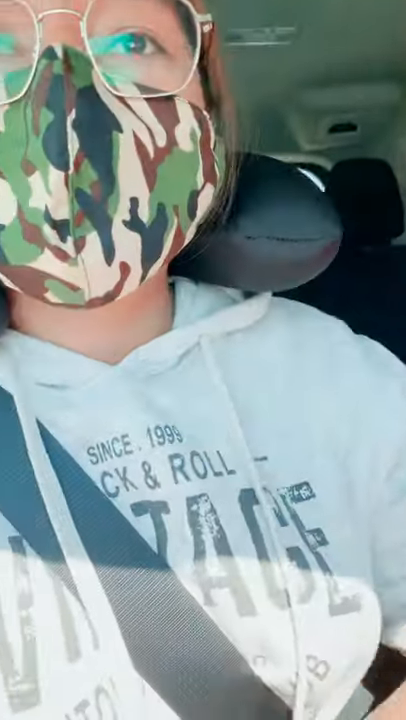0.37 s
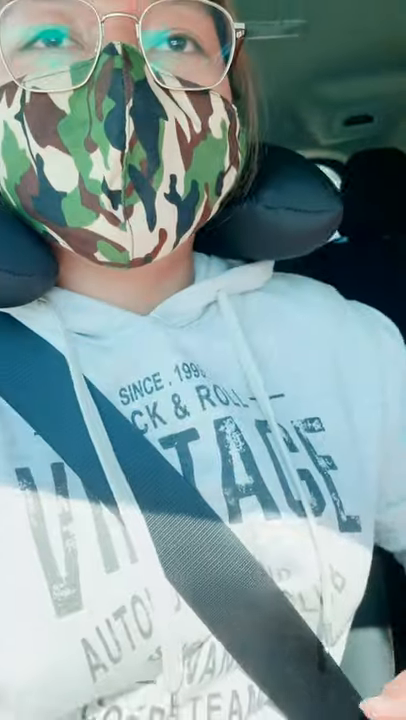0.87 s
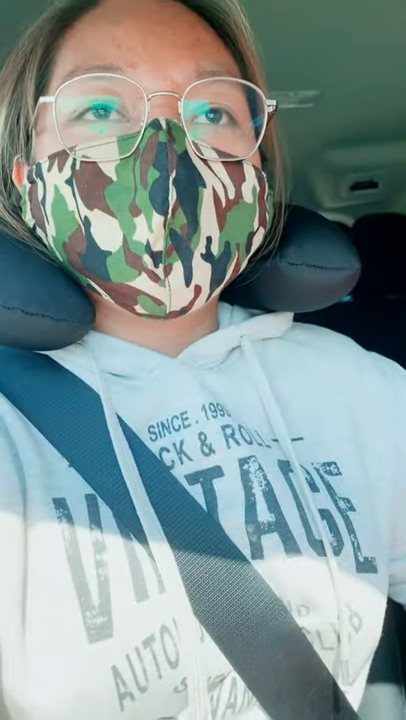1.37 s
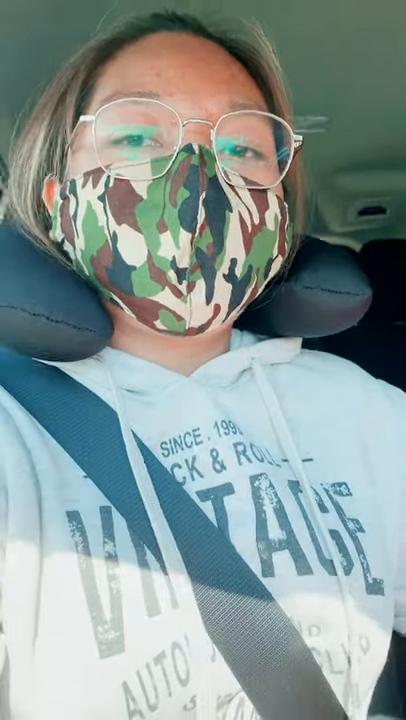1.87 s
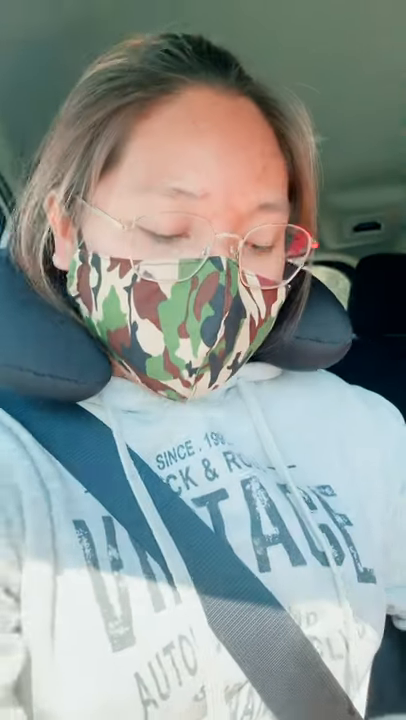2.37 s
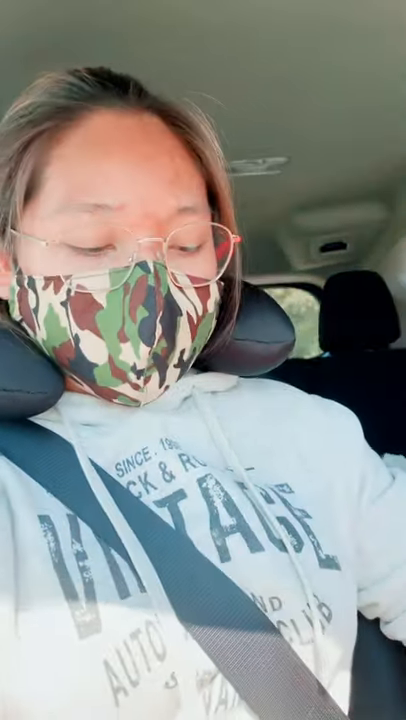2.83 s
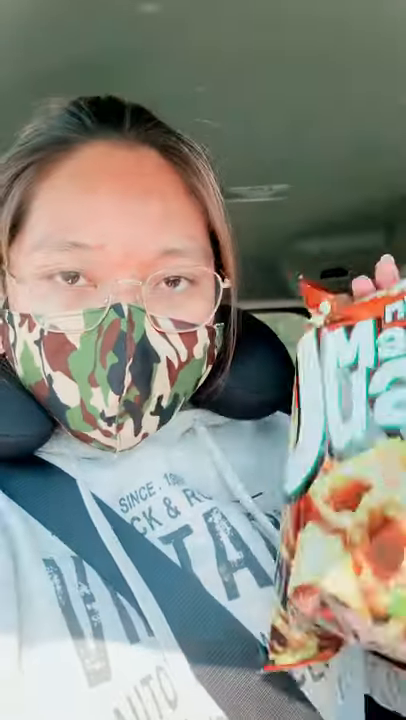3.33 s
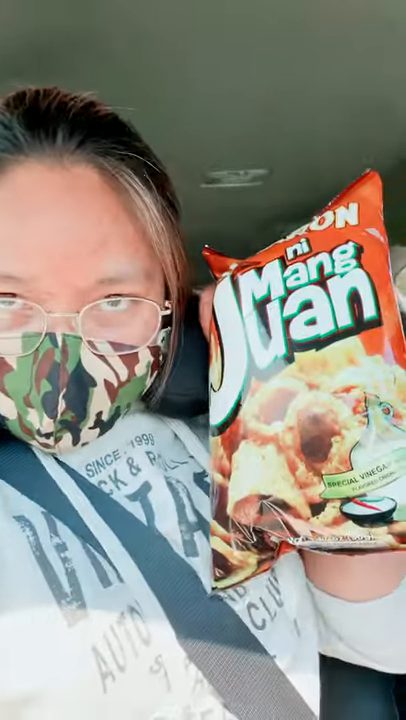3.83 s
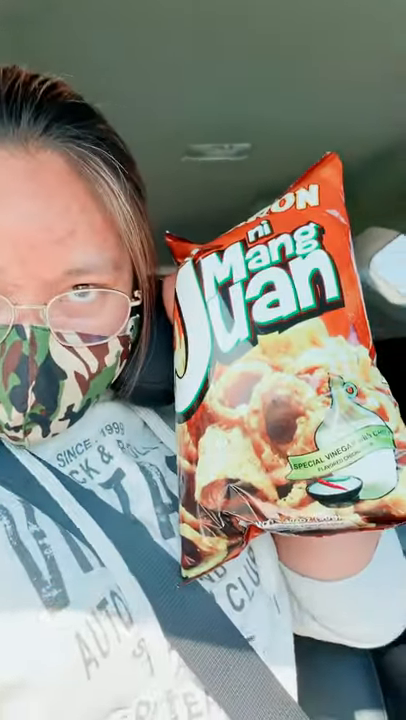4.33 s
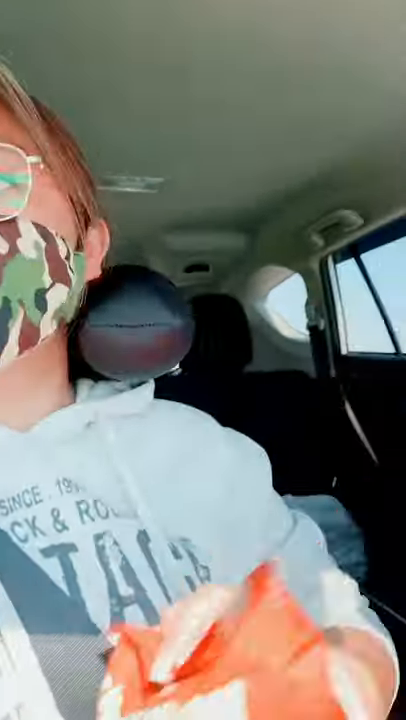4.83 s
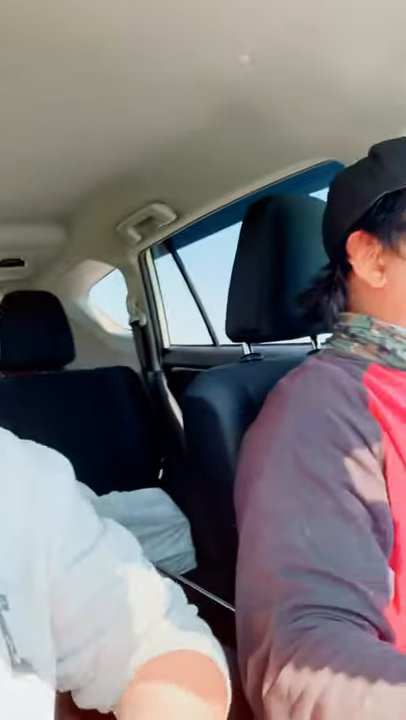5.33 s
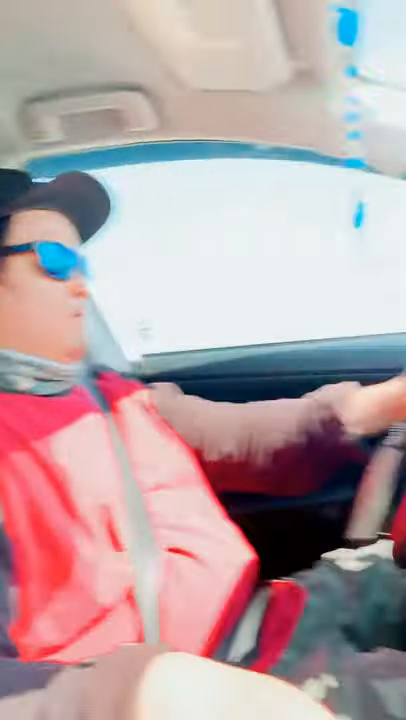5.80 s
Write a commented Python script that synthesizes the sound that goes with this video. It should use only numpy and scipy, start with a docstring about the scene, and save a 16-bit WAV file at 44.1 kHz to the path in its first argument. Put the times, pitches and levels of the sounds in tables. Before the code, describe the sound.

Inside a moving car, a deep, gently swelling tyre rumble runs throughout. After barely audible early film ticks, a hand grabs a foil snack bag: dense, bright, sharp crackles, then quieter regular creaky ticks as it is held up. A second burst of crinkling follows as it is lowered, thinning to faint rustle. Close phone microphone in stereo, short dry cabin reflections.

```python
"""A hand picks up a foil snack bag, holds it creaking and puts it down inside a moving car.
Snaps are short ragged bursts and rustle is modulated noise, both coloured by patches of film.
Dense, quickly damped cabin reflections follow the bag. Behind it, tyres and road drive a steady
rumble: noise through resonances. A phone with two spaced microphone ports listens."""
import sys
import numpy as np
from scipy import signal
from scipy.fft import rfft, irfft
from scipy.io import wavfile

SR = 44100
rng = np.random.default_rng(int(sys.argv[2]) if len(sys.argv) > 2 else 0)


def volts_from_decibels(level):
    """Turn decibel levels (scalar or array-like) into linear amplitude factors."""
    exponent = np.asarray(level, float) / 20
    return 10 ** exponent


def store_wav(level_fs):
    """Save 16-bit WAV to argv[1]."""
    pcm = np.round(np.clip(np.atleast_2d(level_fs), -1, 1) * 32767)
    wavfile.write(sys.argv[1], SR, pcm.T.astype(np.int16))


N = 272670

# the bag is held up and one crease slips again and again
HELD_FROM_S, HELD_TO_S = 3.83, 4.3
# resting rustle strength; a grip FIRM_DB above it moves at full speed
AT_REST_DB, FIRM_DB = -80, 43.5
# a snap with this much treble has the film's plain colour
TREBLE_AT_PAR_DB = -14


def shaped(x, gain):
    """Filter by a gain given on a doubled FFT grid; mirrored ends keep the edges smooth."""
    padded = np.pad(x, [(0, 0), (N // 2, N - N // 2)], mode="reflect", reflect_type="odd")
    return irfft(rfft(padded) * gain, 2 * N)[:, N // 2:N // 2 + N]


def at_hz(points, hz):
    """Read a table on a log-frequency axis."""
    table = np.array(points)
    return np.interp(np.log(hz + 1), np.log(table[:, 0] + 1), table[:, 1])


def in_time(rows):
    """Draw one sample-rate curve per column after the time column."""
    s, *columns = np.transpose(rows)
    return [np.interp(np.arange(N) / SR, s, c) for c in columns]


def rms_one(x):
    """Scale to rms 1."""
    return x / np.sqrt(np.mean(x ** 2) + 1e-20)


def drift(rate):
    """Wander in straight lines between random points, rate points per second with spread 1."""
    steps = rng.standard_normal(int(N / SR * rate) + 2)
    return np.interp(np.arange(N) / SR * rate, np.arange(len(steps)), steps)


def snaps(spread_db, buckle_s):
    """Each crease strains, gives with a sharp step and ends raggedly, in a colour of its own."""
    # the loud or lone film snaps, timed 2 ms before they give; body and treble tilt the colour:
    # time_s, strength_db, body_db, treble_db, ring_hz
    lone_snaps = [(0.7004, -49.5, 4, -24, 3390), (0.8344, -53, 2, -27, 2600),
                  (1.096, -53.5, -20, -12, 8000), (1.3974, -51, 7, -48, 2490), (1.895, -57, -20, -8, 6000),
                  (2.187, -41, 3.5, -37, 2970), (2.2463, -47, 6, -35, 2480), (2.2934, -25.5, -5, -50, 2570),
                  (2.3785, -47, 10, -24, 2660), (2.4358, -21, -5, -1, 7100),
                  (2.4585, -14.5, -19, -9.5, 2800), (2.4654, -12.5, -13, -5.5, 2680),
                  (2.4762, -16.5, -12, -16.5, 4030), (2.4928, -27.5, 1, -8, 2500),
                  (2.4969, -11.5, -16.5, -12.5, 6520), (2.5115, -26, -8, -18, 7070),
                  (2.5416, -22.5, -15, -11.5, 6960), (2.5508, -11.5, -23, -1.5, 6940),
                  (2.5555, -12, -18, -6.5, 6720), (2.5682, -8, -11, -9, 6380),
                  (2.597, -26.5, -19, -9.5, 6590), (2.606, -24.5, 1, -6.5, 3380),
                  (2.6149, -15.5, -9, -14, 6400), (2.6875, -27.5, -2.5, -15, 6620),
                  (2.7237, -32, -9, -15, 3250), (2.7462, -35, -13, -19, 3270),
                  (2.8218, -39.5, -4, -26, 2700), (2.889, -33, -8, -24, 2550),
                  (2.9018, -11.5, -18, -15.5, 5400), (2.9141, -6, -15, -18, 5900),
                  (2.9252, -12.5, -17, -13.5, 5880), (2.9527, -15, -8, -11, 6500),
                  (2.9585, -13.5, -19, -9.5, 6300), (2.9631, -4.5, -16.5, -20.5, 6100),
                  (2.9681, -5.5, -12, -9, 7420), (2.978, -6.5, -16.5, -16.5, 6500),
                  (2.99, -11.5, -17, -8, 7000), (2.9985, -18.5, -13, -12.5, 4000),
                  (3.0393, -29.5, -11, -5.5, 3730), (3.053, -16, -12, -11.5, 4150),
                  (3.0984, -38.5, -11, -6.5, 5940), (3.1068, -23, -12, -8, 5410),
                  (3.1124, -17, -14, -17, 3310), (3.1268, -17.5, -30, -11, 7220),
                  (3.1485, -18.5, -13, -16.5, 3360), (3.157, -24.5, 2, -22.5, 6000),
                  (3.1634, -17, -4, -12, 6500), (3.168, -21, -1, -3, 7000),
                  (3.1726, -19.5, -20, -7.5, 7410), (3.2035, -3, -14.5, -21, 3200),
                  (3.2105, -31.5, -8, -21, 6420), (3.235, -19, -5, -22.5, 3250),
                  (3.3016, -14, -16, -29.5, 3050), (3.3176, -12, -17, -21, 3810),
                  (3.3234, -19, -10, -24, 6200), (3.3415, -24.5, 3.5, -17.5, 3380),
                  (3.3564, -20.5, -23, -6.5, 7100), (3.3735, -27, -7, -5, 6680),
                  (3.4123, -10, -16.5, -19.5, 6520), (3.4184, -14, -5, -23, 6050),
                  (3.4444, -16.5, -16, -28.5, 6980), (3.4619, -23.5, -17, -7.5, 3110),
                  (3.4662, -18, -15, -5.5, 6910), (3.4846, -28.5, -18, -6.5, 6820),
                  (3.495, -28, -5, -17, 2650), (3.5536, -17.5, -15.5, -24, 6870),
                  (3.5944, -43, 6, -24, 2560), (3.6979, -10, -9.5, -18, 3530),
                  (3.7424, -38, -13, -18, 3460), (3.7504, -49, -8, -17, 5710), (3.763, -37, -11, -29, 5610),
                  (3.7795, -35, -6, -22, 5610), (3.7944, -31, -10, -22, 5540),
                  (3.8417, -28.5, -13, -16, 3560), (3.8677, -33, -16, -12.5, 3610),
                  (3.8807, -38.5, -11, -17, 2730), (3.8887, -31.5, -15, -13.5, 3500),
                  (3.905, -28, -23, -16, 3530), (3.9225, -33, -7, -6, 3970), (3.9304, -40, 1, -14, 2660),
                  (3.9364, -33, -8, -19, 3520), (3.9544, -36, -10, -15.5, 2750),
                  (3.9604, -38.5, -2, -26, 2870), (4.0098, -30, -10, -20, 2750),
                  (4.0233, -32, -12, -17, 3550), (4.034, -31.5, -17, -13.5, 6300),
                  (4.046, -28, -22, -20.5, 2990), (4.058, -29, -26, -13.5, 3060),
                  (4.1537, -22, -25, -17, 6240), (4.1702, -28.5, -28, -19, 6290),
                  (4.1808, -30, -18, -17.5, 3370), (4.191, -29, -24, -18.5, 6320),
                  (4.2018, -30, -30, -19.5, 6330), (4.213, -34, -16, -20, 2500),
                  (4.226, -29.5, -21, -20.5, 6240), (4.2487, -28, -25, -20, 3070),
                  (4.2762, -27, -27, -25, 3530), (4.3924, -27, -21, -7.5, 3560),
                  (4.4006, -34, -6, -19, 2920), (4.4104, -35, -10, -7, 3050),
                  (4.4687, -31.5, -17, -14, 2920), (4.5165, -33.5, 10, 4.5, 2900),
                  (4.66, -41.5, 6, -29, 3110), (4.6975, -25.5, -6, -38, 6170), (4.7562, -37, 0, -27, 2780),
                  (4.7797, -35.5, -2, -26, 6990), (4.792, -38, -2, -21, 2610),
                  (4.808, -28.5, -6, -30, 3220), (4.8422, -36.5, 5.5, -28, 3020),
                  (4.9228, -11.5, -19, -20, 3010), (4.9366, -7.5, -15, -20.5, 6700),
                  (4.9454, -18.5, -14, -16, 2760), (4.9746, -14.5, -13, -23, 2890),
                  (5.0847, -31.5, -5, -6, 2520), (4.9845, -22, -18, -17, 6500),
                  (5.148, -19.5, -10, -31, 3050), (5.1562, -12, -7, -33.5, 6540),
                  (5.1635, -14, -18, -21, 6490), (5.1812, -10.5, -26, -18, 5920),
                  (5.1992, -17.5, -1, -20, 6500), (5.2255, -38.5, -12, -23, 5500),
                  (5.2664, -50, -7, -19, 2860), (5.2924, -16, -19.5, -51, 2540),
                  (5.318, -47.5, 18.5, -26, 2500), (5.4304, -18.5, 1, -20, 3000),
                  (5.6695, -53.5, 2, -27, 3490), (5.7478, -47, -2, -2.5, 2510),
                  (5.955, -42, 2.5, -45, 3520)]
    # what the slipping crease rings with: mode_hz, lift_db
    slip_modes = [(3500, 7), (6400, 7.5), (10400, 10.5)]
    gives_s = .002
    build_s, build_db = .002, -7.5   # the film strains audibly just before it gives
    front_db = 9   # the step above its ragged end
    ring_lift_db, ring_octaves = 7, 0.13   # lift and width of the pitch at which a snap rings most

    s, strength_db, body_db, treble_db, ring_hz = np.vstack([creases(), lone_snaps]).T
    at = np.clip(np.round((s + gives_s) * SR).astype(int) - 150, 0, N - 1)
    luck = rng.standard_normal((len(at), 18))   # one draw per snap and film patch
    ragged = rng.choice([-1, 1], (len(at), 300))
    held = (s > HELD_FROM_S) & (s < HELD_TO_S)
    luck[held] *= .3   # the slipping crease keeps nearly the same colour

    after = np.arange(-150, 150) / SR
    strain = volts_from_decibels(build_db) * np.exp(-np.abs(after) / build_s)
    ending = np.exp(-np.abs(after) / buckle_s)
    shape = np.where(after < 0, strain, ending)
    shape[after == 0] = volts_from_decibels(front_db)   # the sharp front keeps the snap broadband
    burst, patches = ragged * shape, iter(luck.T)

    def bump(hz, centre_hz):
        """A resonance on the octave axis."""
        return np.exp(-.5 * (np.log2(hz / centre_hz) / ring_octaves) ** 2)

    def strike(hz, dull, bright):
        """All the bursts, sized for one patch of film."""
        blows = np.zeros(N + 300)
        slip_db = sum(db * bump(hz, mode_hz) for mode_hz, db in slip_modes)
        ring_db = np.where(held, slip_db, ring_lift_db * bump(hz, ring_hz))
        tilt_db = dull * (body_db + 12.5) + 2.27 * bright * (treble_db - TREBLE_AT_PAR_DB)
        size = volts_from_decibels(strength_db + ring_db + tilt_db + spread_db * next(patches))
        np.add.at(blows, at[:, None] + np.arange(len(after)), size[:, None] * burst)
        return blows[:N]
    return volts_from_decibels(-9.0) * film(strike)


def creases():
    """Small creases buckle at random times, as strong as the grip allows: rows like the lone snaps."""
    count = 700
    above_rustle_db, spread_db = -4, 4   # for a firm grip; the spread is exponential
    follow = 0.27   # extra dB of crease for each dB of grip
    body_above_dullness_db = -19.5
    level_db, dull_db = handling()
    when, size, body, edge, pitch = rng.random((count, 5)).T
    at = (when * N).astype(int)
    grip_db = level_db[at]
    strength_db = grip_db + above_rustle_db + follow * (grip_db - AT_REST_DB - FIRM_DB)
    strength_db = strength_db - spread_db * np.log(np.maximum(size, .2))
    body_db = dull_db[at] + body_above_dullness_db + 8 * (body - .5)
    treble_db = TREBLE_AT_PAR_DB + 9 * (edge - .5)
    ring_hz = 2500 * 4 ** pitch
    return np.transpose([at / SR, strength_db, body_db, treble_db, ring_hz])


def rustle(per_s, size_db, clump_db, grip_db):
    """Rubbing hisses smoothly; grips near or above grip_db mix in tiny creases in clumps."""
    level_db, dull_db = handling()
    born = rng.random(N) < per_s * volts_from_decibels(clump_db * drift(60)) / SR
    grains = rms_one(born * volts_from_decibels(size_db * np.minimum(rng.exponential(1, N), 4)))
    firm = 0.45 / (1 + volts_from_decibels(grip_db - level_db))
    rub = firm * grains + np.sqrt(1 - firm ** 2)

    def strike(hz, dull, bright):
        """Fresh rubbing noise for one patch, its level wavering on its own."""
        return volts_from_decibels(dull * dull_db + 2.6 * drift(40)) * rub * rng.standard_normal(N)
    return volts_from_decibels(level_db - 7.5) * film(strike)


def handling():
    """Grips rise, sag while held and fall away; the strongest sets rustle strength and dullness in dB."""
    # the hand grips or rubs the bag; dullness lifts the body of the rustle:
    # start_s, length_s, rustle_db, dullness_db
    grips = [(.01, 0.19, -72, 12), (0.39, .04, -67, 7), (0.608, .04, -60, 3), (0.674, 0.1, -58, 12.5),
             (0.814, 0.084, -59, 14.5), (0.948, .3, -75, 6), (2.151, 0.08, -61, 14.5),
             (2.286, .13, -55.5, 13.5), (2.448, 0.062, -34, 1.5), (2.538, 0.042, -33, 0),
             (2.584, .028, -40.5, 8), (2.644, 0.11, -48.5, 9), (2.901, 0.039, -33, 6.5),
             (2.969, 0.027, -19.5, -2.5), (3.013, 0.058, -36, 10.5), (3.092, .045, -37, -3.5),
             (3.147, 0.028, -33.5, 0.5), (3.217, 0.13, -34.5, 8.5), (3.401, 0.14, -34, 3.5),
             (3.55, .1, -47, 9), (3.672, .09, -39.5, -4), (3.77, 0.11, -60, -3), (3.932, 0.029, -45.5, 0.5),
             (4.004, 0.06, -54, 2), (4.148, .07, -57, -15.5), (4.417, 0.014, -50.5, 4),
             (4.473, 0.16, -50.5, 10.5), (4.688, 0.27, -47, 12.5), (4.873, .04, -40, 5.5),
             (4.915, 0.079, -27.5, 4), (4.982, .06, -37, 13.5), (5.056, 0.062, -44.5, 6),
             (5.149, 0.06, -40, 15), (5.239, 0.053, -51.5, 17), (2.792, .08, -60.5, 0.5),
             (5.353, .07, -58, 5), (5.685, 0.12, -58.5, -1), (5.918, 0.23, -69, -4), (6.096, .04, -66, 5.5),
             (6.156, .05, -55, 2.5)]
    rise_db_per_s, sag_db_per_s, fall_db_per_s = 895, 21.5, 452.5   # rise and fall of a firm grip
    t = np.arange(0, N / SR + .002, .001)
    start, length, level_db, dull_db = np.transpose(grips)[:, :, None]
    speed = np.clip((level_db - AT_REST_DB) / FIRM_DB, .2, 1)   # light rubs swell and fade slowly
    rise_db = speed ** 2 * rise_db_per_s * np.maximum(start - t, 0)
    sag_db = sag_db_per_s * np.clip(t - start, 0, length)
    fall_db = speed * fall_db_per_s * np.maximum(t - start - length, 0)
    shape_db = level_db - rise_db - sag_db - fall_db
    strongest_db = np.maximum(shape_db.max(axis=0), AT_REST_DB)
    return in_time(np.transpose([t, strongest_db, dull_db[shape_db.argmax(axis=0), 0]]))


def film(strike):
    """Third-octave patches of film, each excited by strike(hz, dull, bright), sound together.
    dull is near 1 in the body, bright near 1 at the top."""
    # colour of the film as the phone hears it, with the microphone's resonance near 4.7 kHz:
    # patch_hz, gain_db
    film_colour = [(250, -19.5), (500, 7.5), (1000, 8), (1700, 8), (2500, 2), (3600, 5.5), (4700, 9.5),
                   (5600, 2), (7000, 0), (9000, 3.5), (10400, 1.5), (11200, -14.5), (12000, -22.5),
                   (14000, -60)]
    # the bag turns towards the phone or away: time_s, top_treble_db
    facing = [(0, -1), (2.3, -20), (2.45, -0.5), (3.1, 0), (3.8, -7), (4.4, -8.5), (4.7, -3), (5.5, -11.5),
              (5.95, -18.5), (6.18, 14)]
    shadow_hz = 9100   # turning acts mostly above this
    out, edges = 0, 250 * 2 ** (np.arange(19) / 3)
    treble_db, = in_time(facing)
    for low, high in zip(edges, edges[1:]):
        hz = np.sqrt(low * high)
        dull = 1 / (1 + (hz / 2500) ** 3)
        bright = 1 / (1 + (shadow_hz / hz) ** 6)
        patch = signal.butter(1, [low, high], "band", fs=SR, output="sos")
        ringing = signal.sosfilt(patch, strike(hz, dull, bright) + 1e-18)
        out = out + volts_from_decibels(at_hz(film_colour, hz) + treble_db * bright) * ringing
    return out


def cabin(x, count):
    """Dense reflections off glass and trim, damped fast by seats; each spot has its own pattern."""
    # left-right likeness of the cabin's reflections: freq_hz, likeness (0-1)
    echo_likeness = [(500, 0), (2500, 0), (4700, 0.87), (7000, 0.5), (12000, 0)]
    treble_t60_s, body_t60_s = 0.045, 0.062
    t, hz = np.arange(8192) / SR, np.arange(4097) * SR / 8192
    alike = np.clip(at_hz(echo_likeness, hz), 0, 1)
    dull = 1 / (1 + (hz / 1200) ** 2)
    spot = np.repeat(rng.integers(0, count, N // 256 + 1), 256)[:N]
    spot[int(HELD_FROM_S * SR):int(HELD_TO_S * SR)] %= 3   # the bag barely moves
    out = 0
    for k in range(count):
        noise = rng.standard_normal((2, len(t))) * (t > .0008)
        short = noise * volts_from_decibels(np.maximum(-60 * t / treble_t60_s, -200))
        long = noise * volts_from_decibels(np.maximum(-60 * t / body_t60_s, -200))
        mid, side = (1 - dull) * rfft(short) + dull * rfft(long)   # lows linger
        pair = np.sqrt(1 + alike) * mid + np.sqrt(1 - alike) * side * [[1], [-1]]
        echo = irfft(pair)[:, :6000]
        echo = echo / np.sqrt(np.sum(echo ** 2) / 2)
        out = out + signal.oaconvolve((x * (spot == k))[None], echo, axes=1)[:, :N]
    return out


def road():
    """Tyre noise through resonances, alike at both ports in the bass, with a faint hiss on top."""
    # coarseness of the road surface, heard as the level of the roar before it wavers: time_s, level_db
    coarseness = [(0.0, -22.5), (0.08, -23.5), (1.82, -22), (2.32, -23), (2.63, -21), (3.1, -24.5),
                  (3.18, -22), (6.11, -21), (6.18, -20.5)]
    # relative colour of tyre noise in the cabin: freq_hz, level_db_per_hz
    tyres = [(12, -53), (20, -21), (37, -2.5), (87, 0), (167, -6), (196, -12.5), (251, -12.5), (348, -23.5),
             (599, -24), (786, -34), (978, -35), (1220, -41.5), (4250, -71), (11300, -80.5), (13300, -92)]
    # cabin and tyre resonances, and a faint narrow hiss near 11 kHz: centre_hz, width_hz, lift_db
    colour_peaks = [(49, 34.5, 8), (97, 10, 1.5), (193, 40, 1.5), (261.4, 28, 5), (370, 64, 7),
                    (1010, 150, 8), (1410, 90, 4), (3630, 1100, 6), (11050, 320, 11)]
    # left-right likeness of the diffuse road noise: freq_hz, likeness (0-1)
    road_likeness = [(60, 1), (130, .99), (190, 1), (280, 0.79), (600, 0.54), (1300, 0.2), (3000, 0.5),
                     (8000, 0.6), (12000, 0.03)]
    # slow swells of the low boom: centre_s, lift_db
    swells = [(0.098, 9), (0.498, 3), (0.809, 9), (1.251, 0.5), (1.582, 10.5), (1.948, 4), (3.75, 2.5),
              (3.99, 7), (4.45, 2), (4.719, 4.5), (4.95, 5.5), (5.378, 3), (5.8, 4.5)]
    rest_db, boom_waver_db, roar_waver_db = -28, 1.5, 1.5
    swell_s = 0.27   # half length of a swell

    hz = np.arange(N // 2 + 1) * SR / N
    peaks_db = sum(db / (1 + (2 * (hz - at) / width) ** 2) for at, width, db in colour_peaks)
    colour_db = at_hz(tyres, hz) + peaks_db
    alike = np.clip(at_hz(road_likeness, hz), 0, 1)
    mid, side = rfft(rng.standard_normal((2, N)))
    pair = np.sqrt(1 + alike) * mid + np.sqrt(1 - alike) * side * [[1], [-1]]
    pair = volts_from_decibels(colour_db) * pair

    boom_share = 1 / (1 + (hz / 90) ** 4)   # boom below about 90 Hz, roar above
    boom = rms_one(irfft(pair * boom_share, N))
    roar = rms_one(irfft(pair * (1 - boom_share), N))
    t = np.arange(N) / SR
    swell_db = sum(db * np.maximum(1 - np.abs(t - s) / swell_s, 0) for s, db in swells)
    boom_db = rest_db + boom_waver_db * drift(4.8) + swell_db
    roar_db, = in_time(coarseness)
    return volts_from_decibels(boom_db) * boom + volts_from_decibels(roar_db + roar_waver_db * drift(5.4)) * roar


def scene():
    """The bag, near and reflected, over the road."""
    bag = snaps(spread_db=2.4, buckle_s=.0005)
    bag = bag + rustle(per_s=570, size_db=9.5, clump_db=-3.5, grip_db=-66.5)
    reflected = volts_from_decibels(-3.5) * cabin(bag, count=8)
    return road() + bag + reflected


def band_limit(x):
    """A steep low-pass at the top of the band."""
    return signal.sosfilt(signal.butter(12, 13460, fs=SR, output="sos"), x)


def record(dry):
    """The two ports differ in path and sensitivity, peaks are rounded and the top is cut steeply."""
    # phase by which the left port leads: freq_hz, lead_radians
    port_phase = [(0, .02), (1500, 0), (2500, .9), (3450, 1.6), (4740, 3.15), (6700, 6.3), (8900, 9.45),
                  (11500, 12.3), (14000, 14)]
    # left minus right sensitivity: freq_hz, difference_db
    port_balance = [(60, 1), (110, -0.86), (200, 2.5), (360, 0.5), (650, -0.5), (1180, -0.7), (2150, -0.5),
                    (3900, 1), (7080, 0), (12900, 0.5)]
    opening_s, limit = .003, .66
    hz = np.arange(N + 1) * SR / (2 * N)
    lead = np.interp(hz, *np.transpose(port_phase))
    half = np.array([[.5], [-.5]])
    ports = volts_from_decibels(half * at_hz(port_balance, hz)) * np.exp(1j * half * lead)
    # opens without a click
    opening = np.sin(np.pi / 2 * np.minimum(np.arange(N) / SR / opening_s, 1)) ** 2
    heard = shaped(dry, ports) * opening
    rounded = heard / (1 + (np.abs(heard) / limit) ** 4) ** .25
    top_cut = 1 / np.sqrt(1 + (hz / 12800) ** 70) / np.sqrt(1 + (hz / 11800) ** 14)
    mix = shaped(rounded, top_cut)
    return band_limit(mix)


dry = scene()
out = record(dry)
store_wav(out)
```